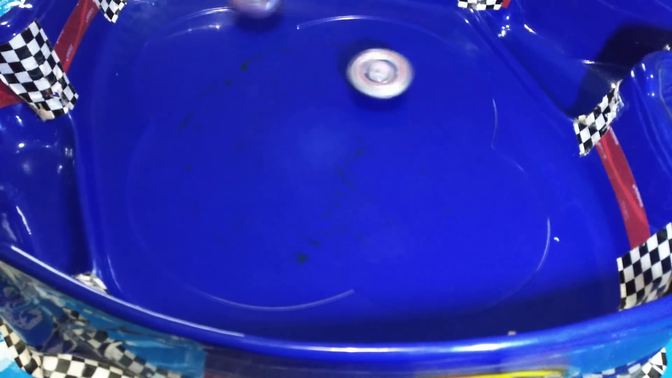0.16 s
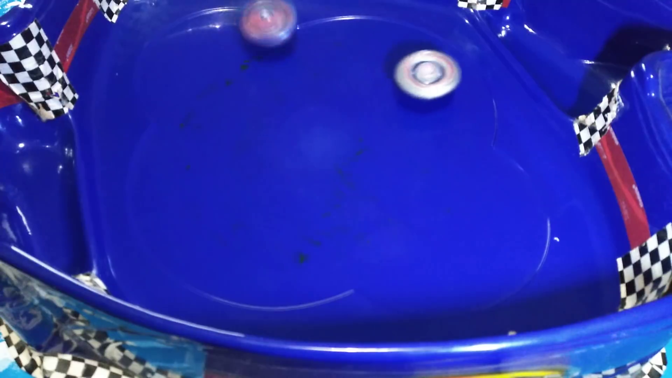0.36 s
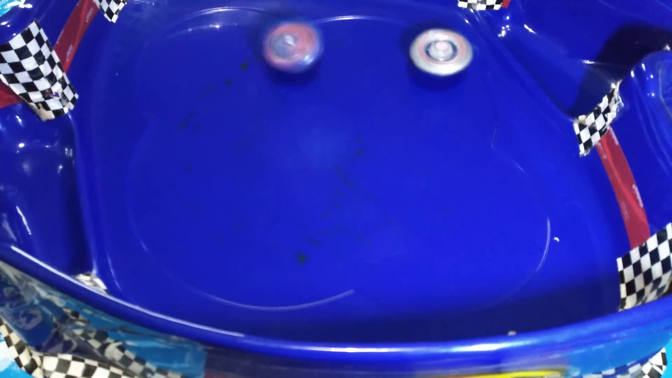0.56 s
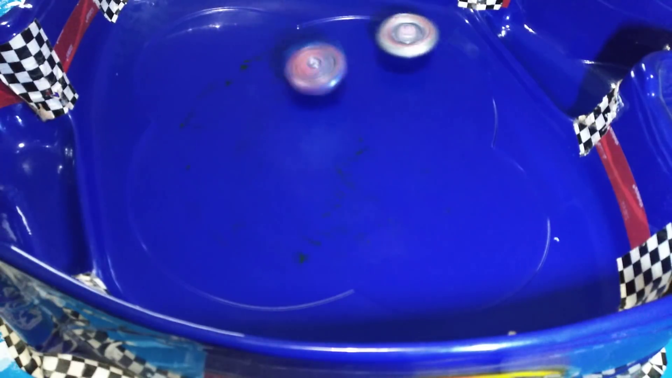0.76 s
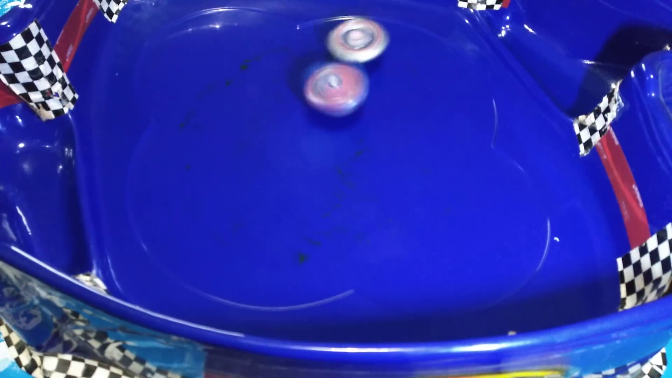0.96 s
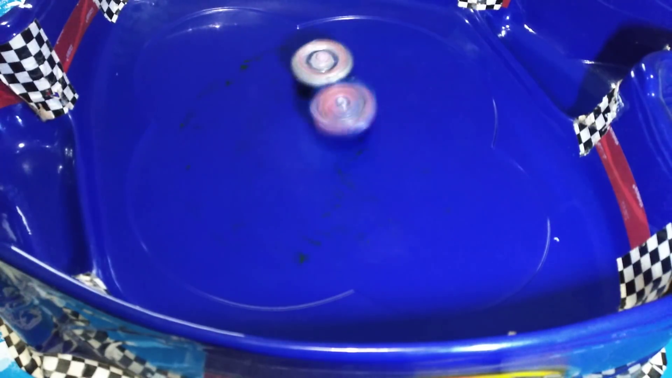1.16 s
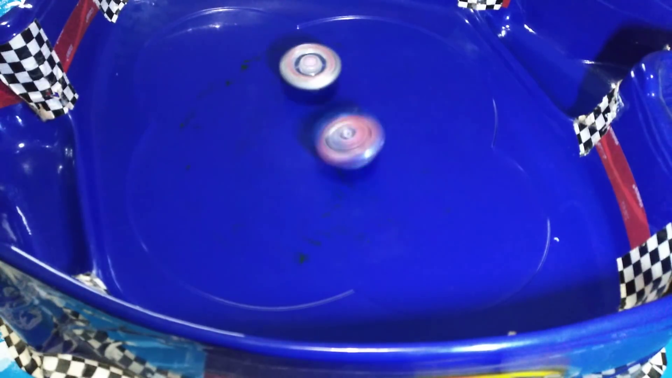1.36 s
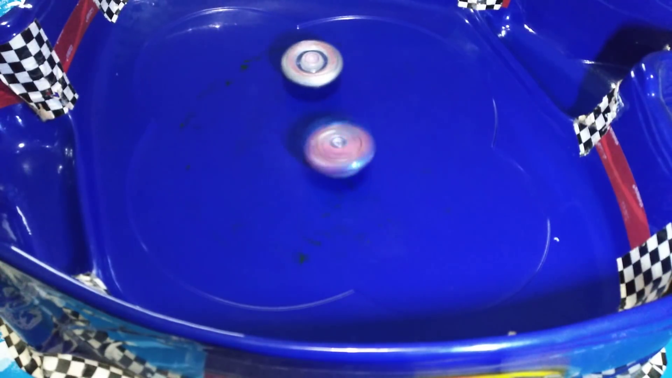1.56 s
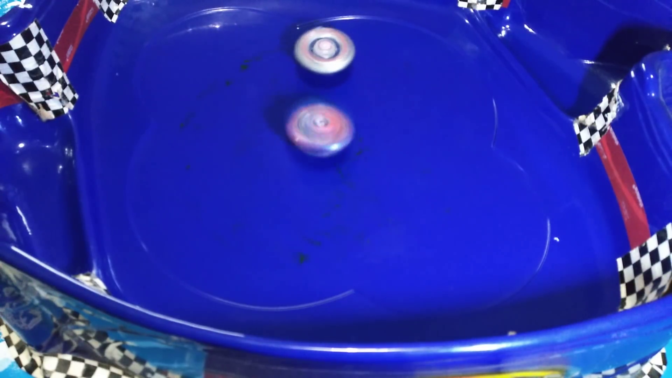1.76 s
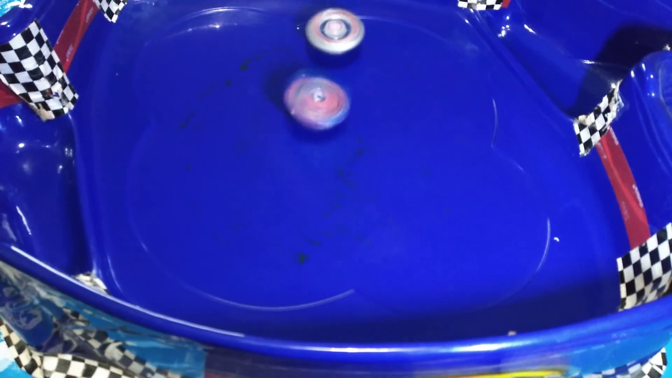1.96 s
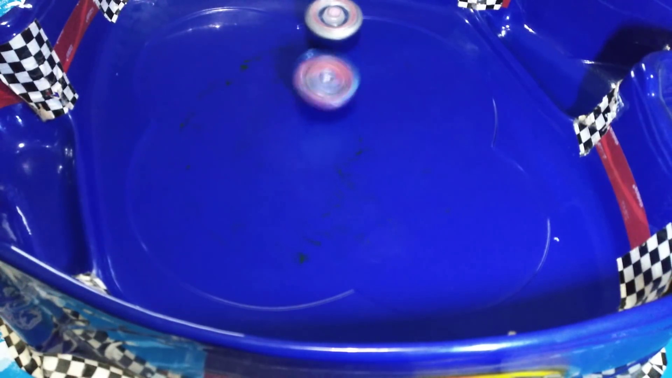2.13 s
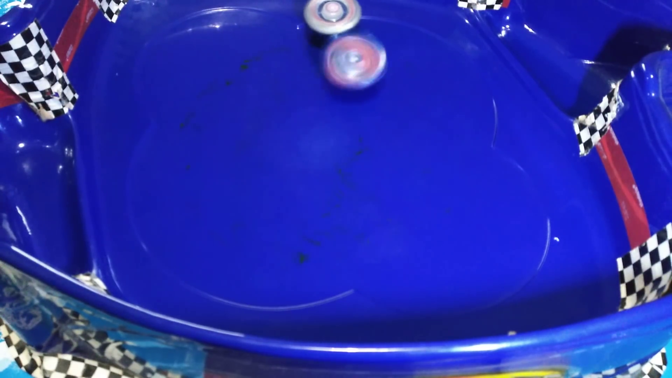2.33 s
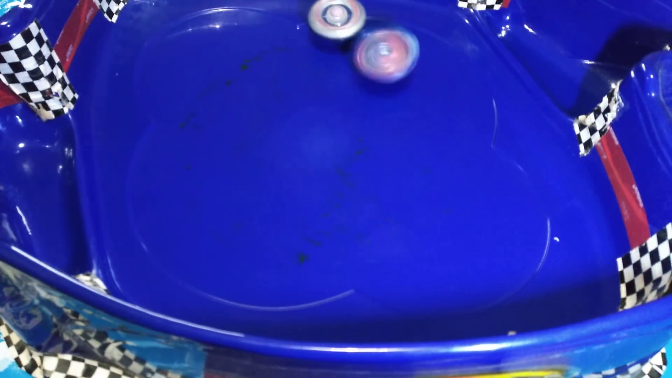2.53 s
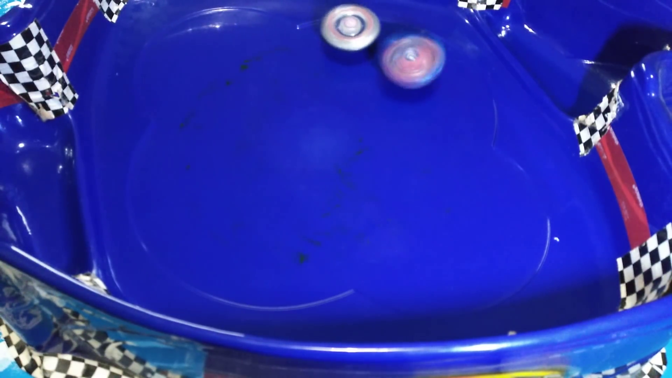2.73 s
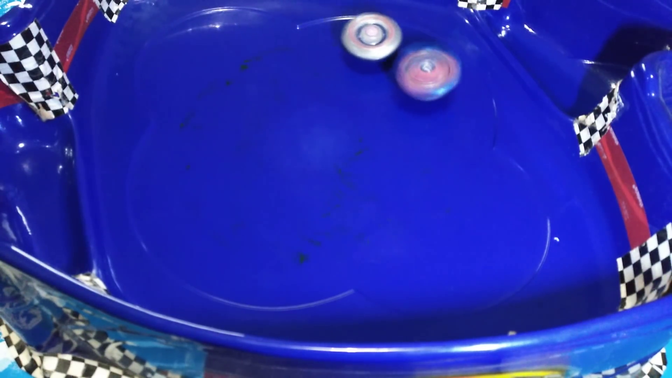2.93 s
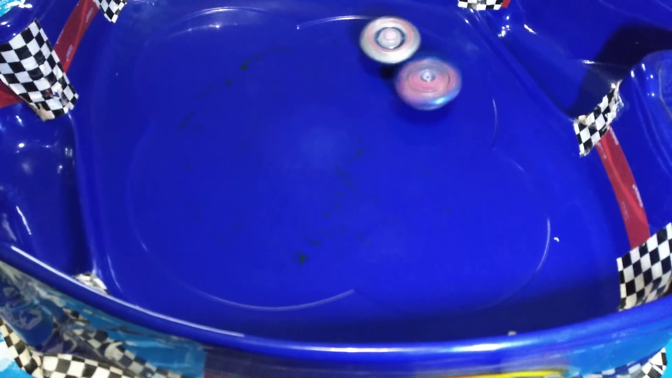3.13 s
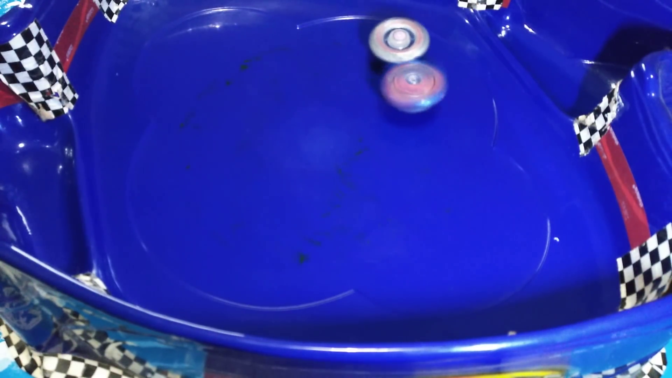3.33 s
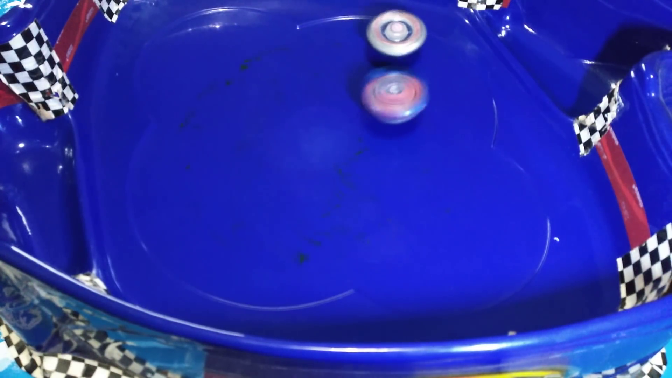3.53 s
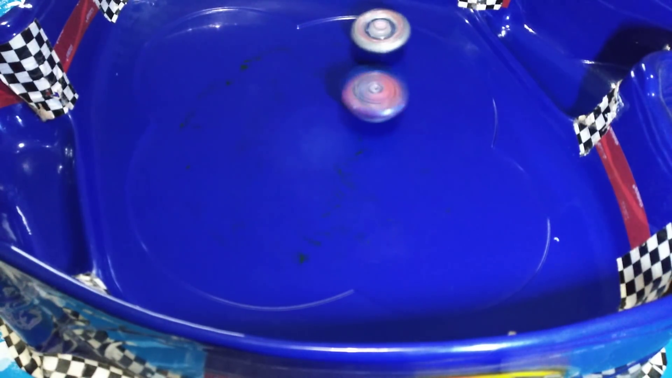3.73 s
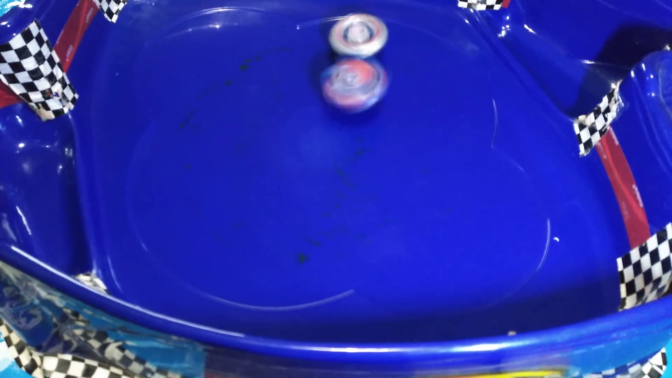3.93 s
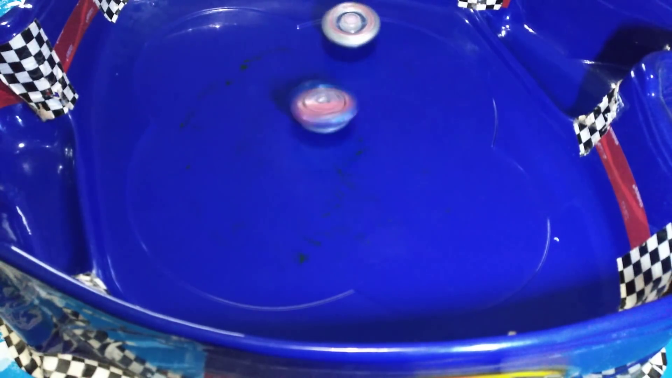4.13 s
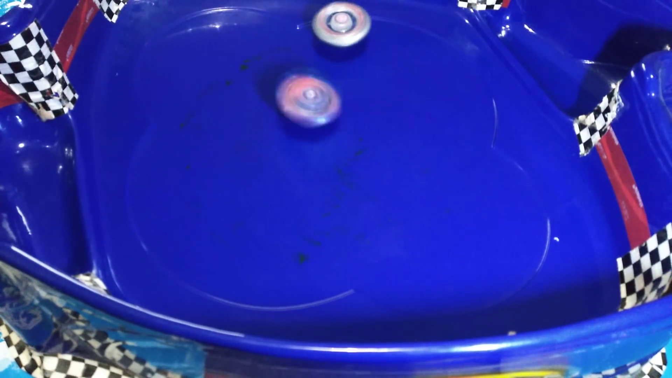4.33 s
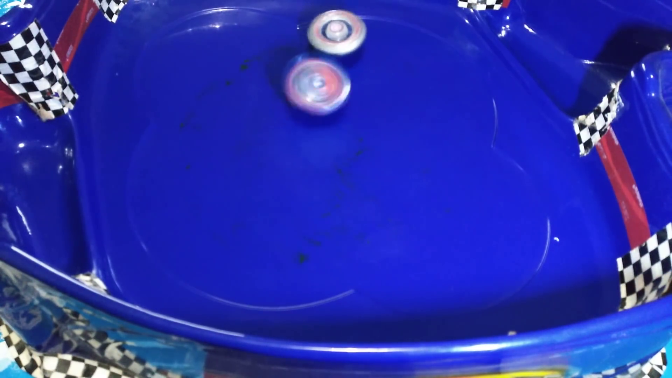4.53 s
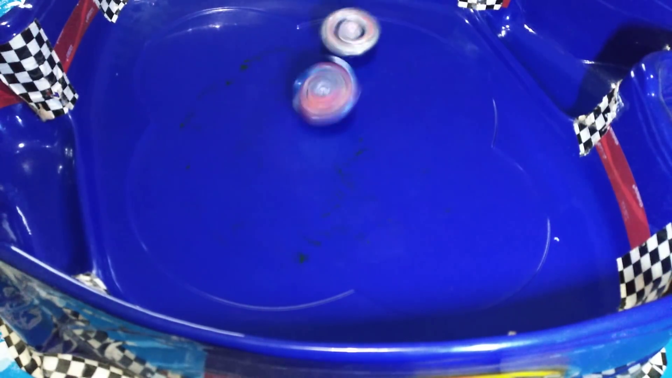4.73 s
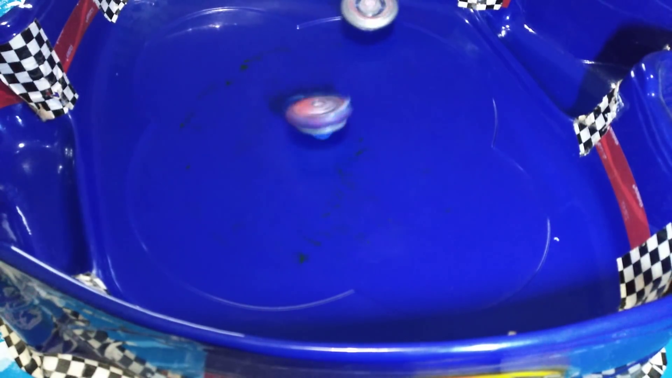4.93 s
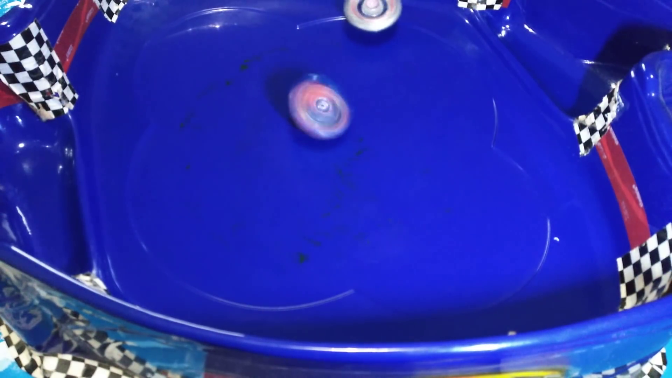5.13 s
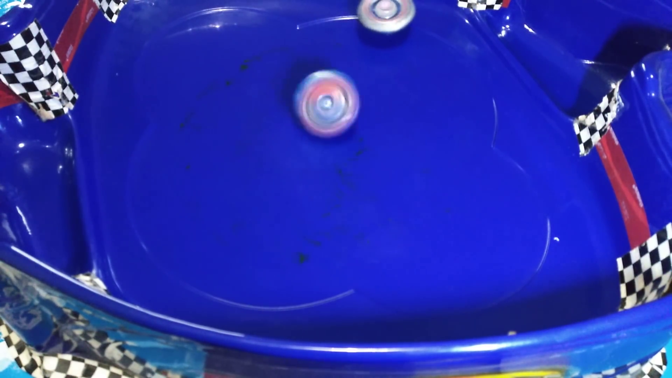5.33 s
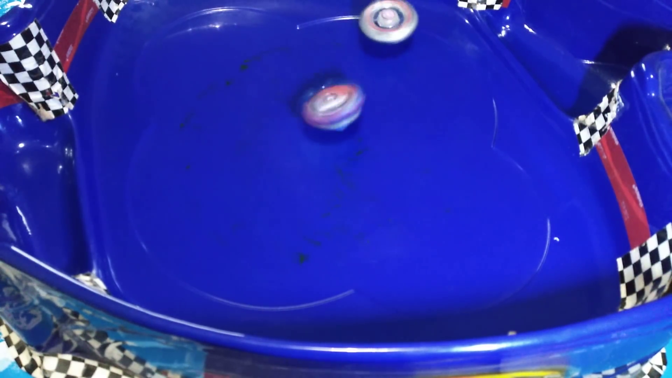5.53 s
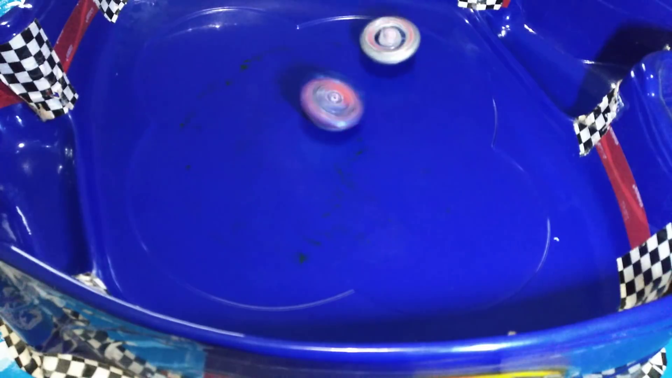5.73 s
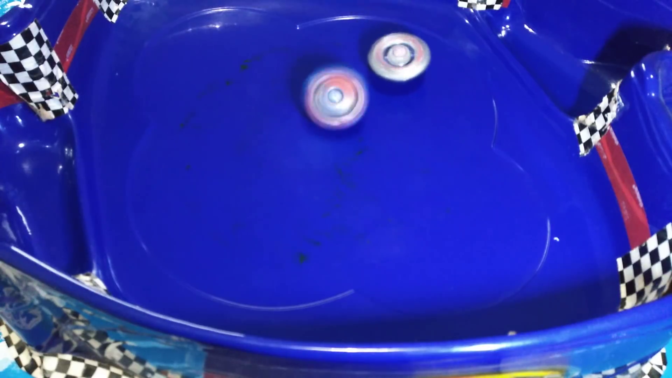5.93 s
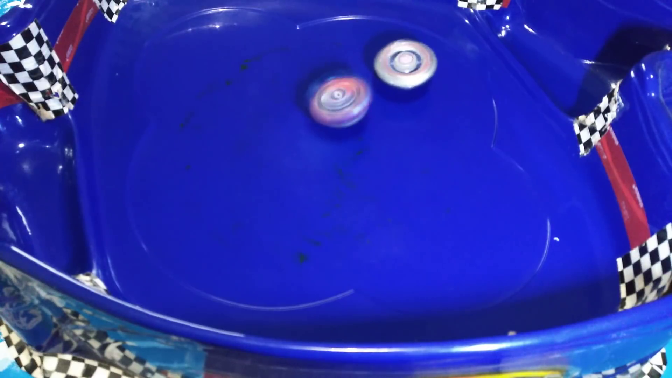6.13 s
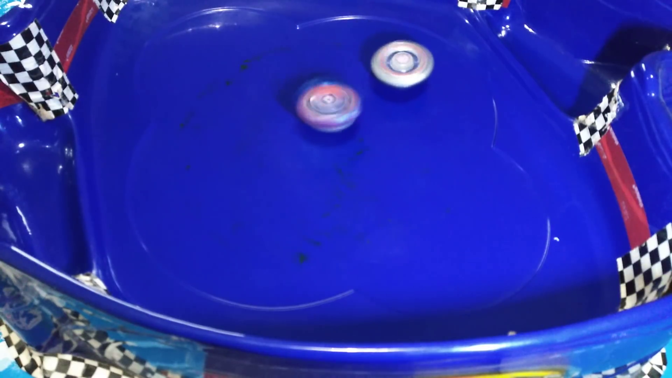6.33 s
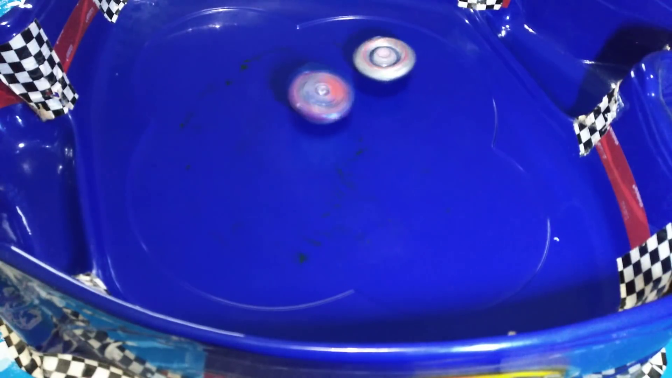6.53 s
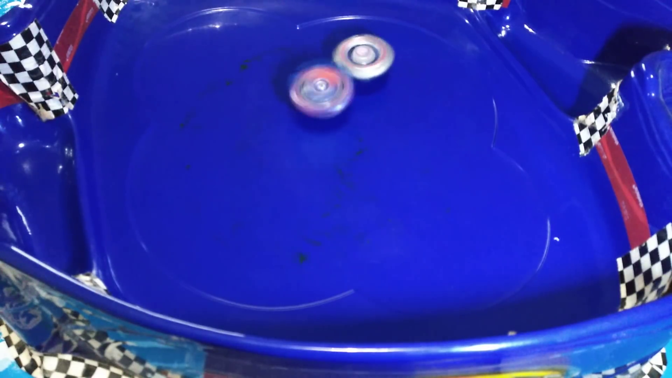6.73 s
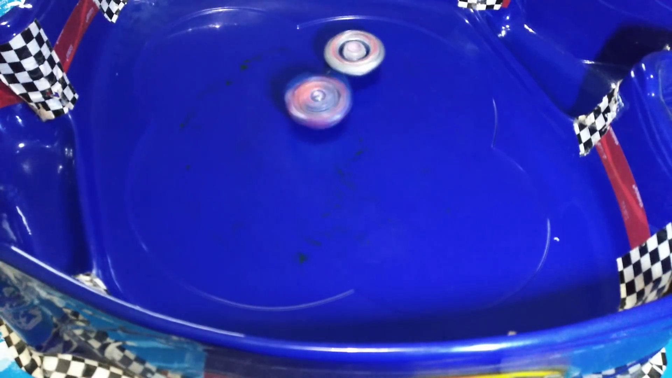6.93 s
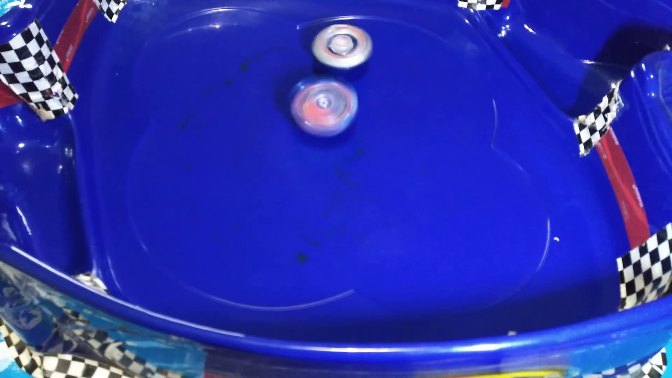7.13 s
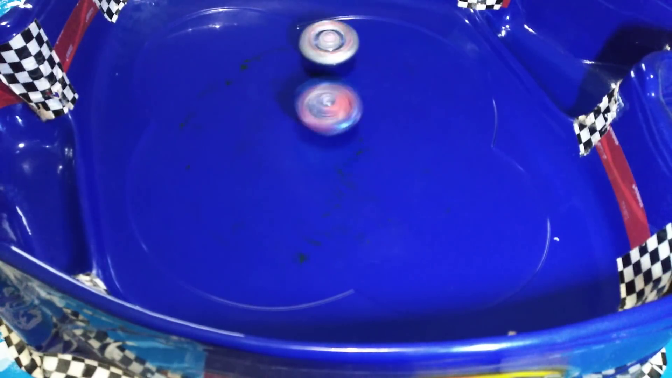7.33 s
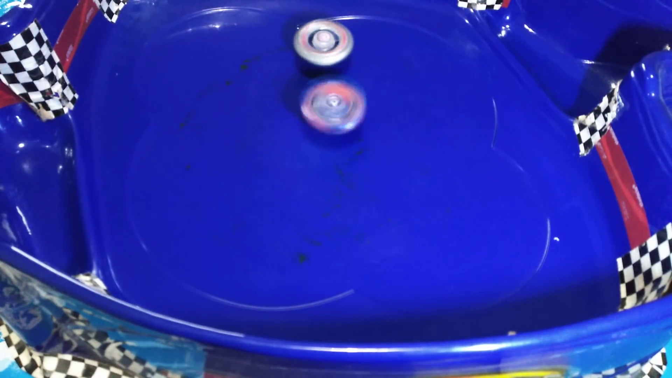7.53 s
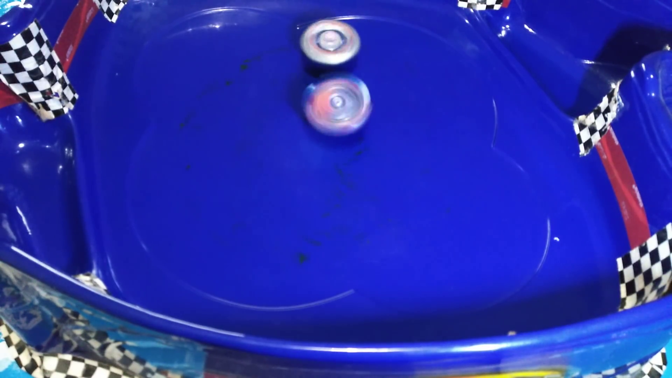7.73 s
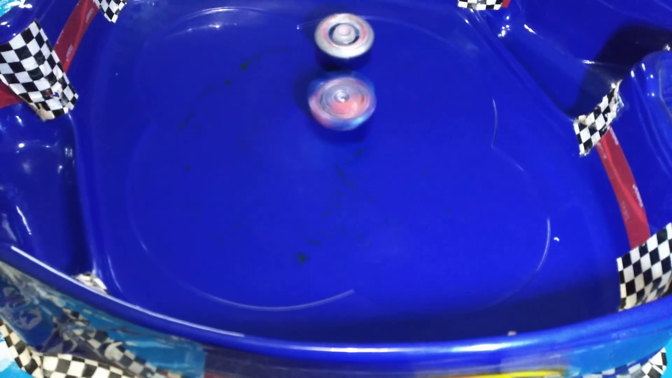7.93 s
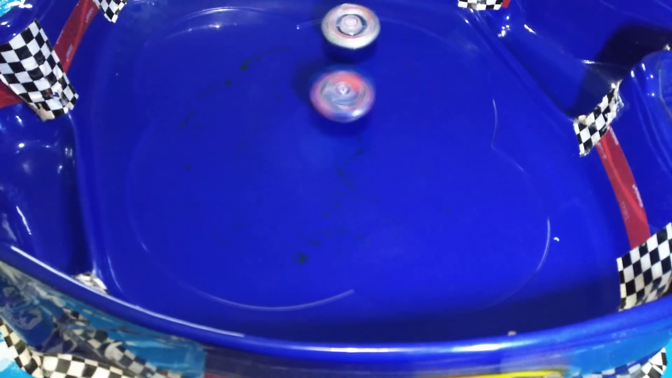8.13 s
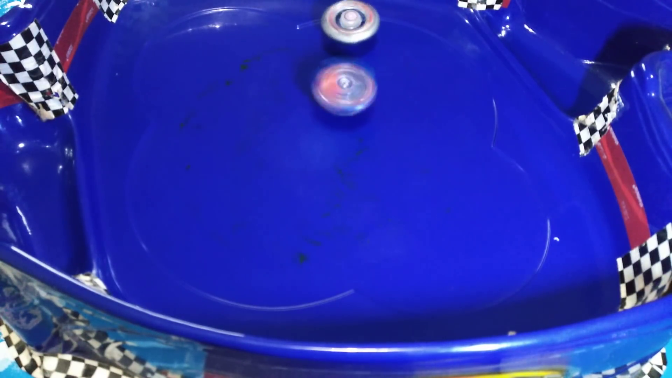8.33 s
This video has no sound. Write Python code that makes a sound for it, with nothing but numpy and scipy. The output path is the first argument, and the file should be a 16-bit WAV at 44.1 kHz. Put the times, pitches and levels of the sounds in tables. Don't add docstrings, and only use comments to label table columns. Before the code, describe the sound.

Close stereo in a small room: a top slams into a thin plastic arena with a burst of hollow knocks, then two tops circle with low buzzing hum and fine rattling. Metal rims crack together sharply four times in the first five seconds. Wobbling brings clattering loose parts and soft booms; later scuffing rubs give way to faint ticks and near silence.

```python
import sys
import numpy as np
from scipy import signal
from scipy.fft import rfft, irfft, next_fast_len
from scipy.io import wavfile
from scipy.ndimage import uniform_filter1d, map_coordinates

SR = 44100
rng = np.random.default_rng(int(sys.argv[2]) if len(sys.argv) > 2 else 0)


def convert_level_to_amplitude(level_db):
    exponent = np.asarray(level_db, float) / 20
    return 10 ** exponent


def to_wav(sig):
    pcm = np.clip(np.atleast_2d(sig), -1, 1) * 32767
    pcm = np.round(pcm).astype(np.int16)
    wavfile.write(sys.argv[1], SR, pcm.T)


N = 373527
TIME = np.arange(N) / SR

# t/s, speed/(turns per s)
SPIN = [(0.0, 18.95), (1.9, 15.65), (3.35, 14.55), (8.47, 11.33)]
# t/s, level/dB
TRAVEL = [(.2, -60.5), (.69, -55), (.88, -59.5), (.96, -75), (1.44, -61.5), (1.73, -66), (1.76, -57),
          (2.27, -50.5), (2.75, -63.5), (3.1, -74.5), (3.88, -72), (4.05, -50), (4.43, -59.5),
          (4.72, -52.5), (5.66, -53), (6.5, -64), (6.94, -53.5), (7.4, -86.5)]
# f/Hz, width/Hz, level/dB
SHELL = [(124, 16, -12), (277, 40, -6.5), (345, 28, -5), (451, 52, 3), (577, 31, -1), (886, 92, -4),
         (1300, 80, -6.5)]
# f/Hz, width/Hz, level/dB
TAP = [(558, 24, -10.5), (1004, 55, 4), (1400, 73, -10.5), (1816, 140, -4.5)]
# f/Hz, width/Hz, level/dB
CHATTER = [(3310, 400, 0), (4600, 300, -9)]
# f/Hz, width/Hz, level/dB
TINKLE = [(5620, 1200, -4), (7830, 370, 5.5), (10000, 51, -14), (11000, 26, -11.5), (11500, 210, -17.5),
          (13300, 130, -16)]
# f/Hz, density/dB per Hz
LOW = [(15, -43), (25, -37), (86, 5), (113, 1), (144, -5), (188, -5.5), (220, -26), (260, -4.5), (340, -31),
       (570, -120)]
# f/Hz, density/dB per Hz
BUMP = [(88, -36), (150, 0), (370, -3.5), (452, 1), (493, -12.5), (539, -3), (1560, -22), (3000, -44),
        (3900, -67), (6600, -120)]
# f/Hz, density/dB per Hz
SCRAPE = [(880, -30), (1500, -1), (1630, -21.5), (1830, -4.5), (2250, -18), (3290, -10.5), (3760, -9),
          (7550, -12), (9060, -38.5), (13000, -42), (14800, -42.5)]
# f/Hz, density/dB per Hz
RUB = [(180, -17.5), (300, 2.5), (522, -12.5), (760, -4.5), (1040, -22), (1280, -3.5), (1430, -13.5),
       (3690, -7), (6420, -6.5), (13200, -25.5), (14800, -40.5)]
THUMP_FROM_S, THUMP_TO_S = 1.9045, 2.96


def unit(x):
    return x / np.sqrt(np.mean(x ** 2) + 1e-20)


def along(points, hz):
    f, v = np.transpose(points)
    return np.interp(np.log(hz + 1), np.log(f + 1), v)


def curve(rows):
    s, value = np.transpose(rows)
    return np.interp(TIME, s, value)


def wobble(rate):
    knots = rng.standard_normal(int(N * rate / SR) + 4)
    return map_coordinates(knots, [np.arange(N) * rate / SR])


def filtered(x, response):
    m = next_fast_len(N + SR // 2)
    return irfft(rfft(x, m) * response(np.fft.rfftfreq(m, 1 / SR)), m)[..., :N]


def body(peaks, size=4096):
    f = np.fft.rfftfreq(size, 1 / SR)
    response = 0
    for k, (hz, width, db) in enumerate(peaks):
        loss = 1j * f * width
        response = response + (-1) ** k * convert_level_to_amplitude(db) * loss / (hz * hz - f * f + loss)
    h = irfft(response)
    return h / np.linalg.norm(h)


def colour(spectrum, size=4096):
    gain = convert_level_to_amplitude(along(spectrum, np.fft.rfftfreq(size, 1 / SR)))
    cepstrum = irfft(np.log(gain + 1e-6))
    cepstrum[1:size // 2] *= 2
    cepstrum[size // 2 + 1:] = 0
    h = irfft(np.exp(rfft(cepstrum)))
    return h / np.linalg.norm(h)


def through(x, h):
    return signal.fftconvolve(x, h)[:N]


def bursts(times, db, t60, rise=0.00071, size=2048):
    t = np.arange(size) / SR
    decay = np.reshape(np.maximum(t60, 1 / SR), (-1, 1))
    puff = rng.standard_normal((len(times), size)) * convert_level_to_amplitude(-60 * t / decay)
    puff *= (1 - np.exp(-(t + 1 / SR) / rise)) ** 2
    puff *= convert_level_to_amplitude(db)[:, None] / np.linalg.norm(puff, axis=1, keepdims=True)
    at = np.round(np.asarray(times) * SR).astype(int)[:, None] + np.arange(size)
    return np.bincount(np.clip(at.ravel(), 0, N), puff.ravel(), N + 1)[:N]


def sides(times, pan_db):
    latest = np.clip(np.searchsorted(times, TIME + .002) - 1, 0, None)
    return convert_level_to_amplitude(pan_db[latest] * np.array([[.5], [-.5]]))


def pair(first, second):
    # f/Hz, correlation/1
    alike = [(60, 0.97), (130, 0.84), (290, 0.98), (630, 0.84), (1370, 0.65), (2990, -0.0075),
             (6540, 0.071), (14300, 0.043)]

    def blend(hz):
        turn = np.arccos(np.clip(along(alike, hz), -1, 1)) / 2
        return np.array([np.cos(turn), np.sin(turn)])

    mid, side = filtered(np.array([first, second]), blend)
    return np.array([mid + side, mid - side])


def both(make):
    return pair(make(), make())


def hiss(h):
    return both(lambda: through(rng.standard_normal(N), h))


def struck(h, *burst, **shape):
    return both(lambda: through(bursts(*burst, **shape), h))


def patchy(x, depth_db, wide, long):
    z = signal.stft(x, nperseg=1024)[2]
    field = uniform_filter1d(rng.standard_normal(z.shape[1:]), wide, 0)
    field = uniform_filter1d(field, long, 1)
    return unit(signal.istft(z * convert_level_to_amplitude(depth_db * unit(field)), nperseg=1024)[1][:, :N])


def grit(scatter_db, rate):
    hit = rng.random(N) < rate / SR
    return hit * convert_level_to_amplitude(scatter_db * rng.standard_normal(N)) * rng.choice([-1, 1], N)


def lobes(turns, scatter_db, memory, count):
    slot = np.floor(turns * count).astype(int)
    at = np.flatnonzero(np.diff(slot))
    knots = rng.standard_normal((2, 400, count))
    where = [turns[at] / max(memory, .5), slot[at] % count]
    size, push = (map_coordinates(k, where, order=1) for k in knots)
    out = np.zeros(N)
    out[at] = convert_level_to_amplitude(scatter_db * size) * push
    return out


def rolling():
    # t/s, level/dB
    lean_curve = [(.69, -70.5), (.9, -88.5), (1.73, -75), (1.76, -63), (2.93, -78.5), (3.06, -86),
                  (3.9, -83), (4.05, -59), (4.6, -76.5), (4.85, -54.5), (6.25, -65.5), (6.57, -79.5),
                  (6.6, -52.5), (6.94, -50.5), (7.35, -96.5), (7.8, -86), (7.94, -71.5), (8.47, -80.5)]
    travel, lean = convert_level_to_amplitude(curve(TRAVEL)), convert_level_to_amplitude(curve(lean_curve))
    turns = np.cumsum(curve(SPIN)) / SR

    def tip(h, scatter_db, memory):
        return unit(both(lambda: through(lobes(turns, scatter_db, memory, count=41), h)))

    boom = unit(tip(colour(LOW), 2, memory=4) + .5 * unit(hiss(colour(LOW))))
    bumps = unit(tip(colour(BUMP), 4, memory=4.5) + .3 * unit(hiss(colour(BUMP))))
    parts = body(TINKLE) + 0.8 * body(CHATTER)
    specks = unit(both(lambda: through(grit(6.7, rate=520), parts)))
    sweep_db = 3.3 * np.cos(4 * np.pi * turns) + 0.97 * wobble(45)
    scrape = unit(convert_level_to_amplitude(sweep_db) * (unit(hiss(colour(SCRAPE))) + .5 * specks))
    bumps, scrape = patchy(bumps, 3.5, 3, 18), patchy(scrape, 4.5, 6, 16)
    thumping = (TIME > THUMP_FROM_S) & (TIME < THUMP_TO_S)
    bumps = bumps * convert_level_to_amplitude(-0.5 * thumping)
    drag = convert_level_to_amplitude(-1 - 55) * (lean / convert_level_to_amplitude(-55)) ** 1.4
    bump_gain = np.hypot(convert_level_to_amplitude(3.5) * travel, drag)
    return convert_level_to_amplitude(3) * travel * boom + bump_gain * bumps + convert_level_to_amplitude(.5) * lean * scrape


def thumps():
    turns = np.cumsum(curve(SPIN)) / SR
    whole = np.arange(turns[round(THUMP_FROM_S * SR)], turns[round(THUMP_TO_S * SR)])
    second = whole[3:] + .46
    at = np.searchsorted(turns, np.concatenate([whole, second]))
    db = curve(TRAVEL)[at] + 32.5 + 0.5 * (np.arange(len(at)) >= len(whole))
    db = db + 3 / 2 * rng.standard_normal(len(at))
    return struck(colour(BUMP) + 0.2 * body(TAP), at / SR, db, 0.0143, rise=0.00094)


def clang(peaks, size=4096):
    contact_s, extra_loss = 0.0016, 1.3
    hz, wide, db = np.transpose(peaks)[:, :, None]
    t = np.arange(size) / SR
    decay = np.exp(-np.pi * extra_loss * wide * t)
    h = convert_level_to_amplitude(db) * wide * decay * np.sin(2 * np.pi * (hz * t + rng.random(hz.shape)))
    h = h.sum(axis=0) * (1 - np.exp(-t / contact_s)) ** 2
    return h / np.linalg.norm(h)


def clashes():
    # t/s, peak level/dB, shell knock/dB, blow length/s, left over right/dB
    clash = [
        (1.122, -9.5, -21.5, 0.013, 2),
        (3.3325, -16.5, -18.5, 0.0086, -0.5),
        (3.8841, -6, -18, 0.0098, -3),
        (4.6395, -6.5, -24, 0.015, -3),
    ]
    # f/Hz, density/dB per Hz
    blow = [
        [(120, -41), (200, -19), (1400, -4), (2310, -6), (2670, -10), (2970, -6), (6800, 0), (13500, -19.5),
         (14800, -47.5)],
        [(120, -52), (200, -34), (771, -16), (1250, -3.5), (1580, -19.5), (1760, -11.5), (6800, -8.5),
         (11500, -19.5), (14800, -36)],
        [(120, -43.5), (200, -15.5), (441, -14.5), (992, -15.5), (1280, -7.5), (2570, -7.5), (5890, -0.5),
         (13500, -14), (14800, -68)],
        [(120, -24), (200, -8.5), (1300, -8), (3970, -9.5), (4500, -0.5), (6800, -1), (8000, -2),
         (13500, -28.5), (14800, -47)],
    ]
    # f/Hz, width/Hz, level/dB
    modes = [
        [(2190, 100, -9), (2470, 140, -14.5), (3160, 150, -7), (4750, 170, -4.5), (6980, 240, 3),
         (7820, 170, 0.5), (8000, 100, -9.5), (8800, 200, -14.5), (10700, 250, -11), (11200, 210, -15),
         (12140, 400, -14.5), (12980, 180, -14)],
        [(1294, 180, -12), (2130, 390, -6), (3070, 450, 2), (4190, 120, -7.5), (4720, 170, -9.5),
         (6700, 140, -13), (7070, 530, 2.5), (8800, 280, -5), (10400, 137, -21), (11240, 420, 0),
         (13260, 260, -11.5)],
        [(950, 170, -10.5), (1314, 35, -10), (2183, 250, -5), (3120, 83, -11), (4220, 150, 1.5),
         (4850, 110, -7.5), (4880, 140, -5.5), (5730, 290, 1.5), (7244, 190, -1), (8400, 290, -7),
         (11000, 250, -6.5), (13450, 120, -11.5)],
        [(1268, 40, -7.5), (2580, 60, -11), (3147, 150, -15), (4400, 110, -5), (5630, 80, -6.5),
         (6100, 160, -15.5), (7860, 130, 1.5), (10700, 95, -9.5), (11400, 200, -14), (12700, 170, -18.5),
         (13000, 220, -12)],
    ]
    # f/Hz, level/dB, t60/s
    metal = [(3284, -14, .12), (4630, -6, .15), (4716, -11, .15), (5631, 0, .18), (5776, -6, .16),
             (6830, -14, .1), (7919, -3, .06), (10780, -14, .11), (11220, -15, .11), (13140, -17, .08)]
    ring_db = [-31, -28, -29, -13]
    s, db, knock_db, length, pan = np.transpose(clash)
    each = [slice(k, k + 1) for k in range(len(s))]

    def clangs():
        return sum(through(bursts(s[k], db[k] + 16, 0, size=8), clang(m)) for k, m in zip(each, modes))

    crack = sum(struck(colour(b), s[k], db[k] + 10, length[k], rise=.0011) for k, b in zip(each, blow))
    near_clang, far_clang = clangs(), clangs()
    crack = crack + pair(near_clang, far_clang)
    knocked = body(SHELL) + 0.2 * colour(BUMP) + 0.21 * colour(LOW)
    knock = struck(knocked, s, db + knock_db + 23.0, 0.037)
    shaken = colour(LOW) + 1.2 * colour(BUMP)
    knock = knock + struck(shaken, s, db - 20.5 + 18.5, 0.53, size=16384)

    t, ring = np.arange(SR // 2) / SR, np.zeros((2, N + SR))
    onset = 1 - np.exp(-t / 0.000081)
    for start, level in zip(s, db + ring_db):
        drift = .02 * np.cumsum(rng.standard_normal((len(metal), 2, len(t))), axis=2)
        first = round(start * SR)
        for (hz, own_db, t60), blur in zip(metal, drift):
            tone = np.sin(2 * np.pi * hz * t + blur)
            ring[:, first:first + len(t)] += convert_level_to_amplitude(level + own_db - 60 * t / t60) * tone * onset

    even = sum(through(bursts(s[k], db[k] + 15, 0, size=8), colour(b)) for k, b in zip(each, blow))
    carried = even + .3 * near_clang + ring[0, :N] + knock[0]
    return (crack + ring[:, :N]) * sides(s, pan) + knock, carried


def shell():
    # t/s, peak level/dB, rattle/dB
    drop = [(.002, -3, -5.5), (.0045, -4.5, -19), (.009, -7.5, -10), (0.011, -5.5, -10.5),
            (0.0207, -10, -21), (0.0212, -2, -14), (.026, -5.5, -11), (.034, -15.5, -26.5),
            (0.042, -17, -23.5), (.118, -19.5, -26.5), (0.1228, -14.5, -28), (0.1461, -20.5, -7),
            (4.94, -39, -19), (4.985, -24, -16), (4.995, -20.5, -14.5), (5.001, -20.5, -15.5),
            (5.014, -29.5, -12.5), (5.045, -27, -4), (5.428, -33, 2.5), (5.487, -29, -2.5),
            (6.244, -40.5, -9), (6.363, -34, -2), (6.472, -38.5, 0), (7.942, -42, -15), (8.015, -47.5, -15)]
    # f/Hz, density/dB per Hz
    landing = [(35, -60.5), (110, -11), (335, -1.5), (411, -12), (477, 8.5), (786, -17.5), (911, -7.5),
               (1420, -16), (5000, -34.5), (6500, -66), (11000, -120)]
    # t/s, f/Hz, peak level/dB, swell/s, t60/s
    boom = [
        (5.699, 120, -25, 0.011, 0.16),
        (5.785, 112, -38, 0.014, 0.2),
        (6.114, 120, -37, 0.019, 0.16),
        (6.93, 250, -31, 0.018, 0.11),
        (3.905, 1290, -34, 0.006, 0.05),
    ]
    s, db, rattle_db = np.transpose(drop)
    push = np.zeros(N)
    push[np.round(s * SR).astype(int)] = convert_level_to_amplitude(db + 10.0) * rng.choice([-1, 1], len(s))
    blunt = np.hanning(24) / 6
    soft = signal.fftconvolve(body(SHELL) + 1.04 * colour(landing), blunt)
    soft = soft * convert_level_to_amplitude(-60 * np.arange(len(soft)) / SR / 0.12)
    out = through(push, soft) + struck(colour(RUB), s, db + rattle_db + 11.0, 0.024)
    for start, hz, peak_db, swell, t60 in boom:
        t = np.clip(TIME - start, 0, None)
        envelope = convert_level_to_amplitude(peak_db - 60 * t / t60) * (1 - np.exp(-t / swell)) ** 2
        out = out + envelope * 4 * np.sin(2 * np.pi * hz * t)
    return out


def grinds():
    # t/s, peak level/dB, shell knock/dB, rub length/s, left over right/dB
    grind = [(4.232, -43, -12, 0.17, 3), (4.5274, -46.5, 5, 0.041, 4.5), (6.578, -51, -32, 0.38, 18.5),
             (6.5893, -58, -15, 0.14, 28), (6.6389, -16.5, -8.5, 0.076, -1.5),
             (6.718, -21.5, -7.5, 0.087, 1.5), (6.906, -42, -21, 0.18, 21.5), (7.041, -35.5, -10, 0.088, 8),
             (7.052, -22, -53.5, 0.087, 12.5), (7.0651, -21.5, -8.5, 0.27, 5),
             (7.941, -45.5, -20, 0.05, 11), (8.127, -55, -1.5, 0.039, -19)]
    s, db, knock_db, length, pan = np.transpose(grind)
    rub = struck(colour(RUB), s, db + 19.0, length, rise=0.00034, size=8192)
    rub = rub + struck(colour(RUB), s, db - 3.5, 0.0035)
    shaken = body(SHELL) + 0.24 * colour(BUMP) + 0.89 * colour(LOW)
    return rub * sides(s, pan) + struck(shaken, s, db + knock_db + 19.0, 0.12)


def knocks():
    # t/s, peak level/dB, larger parts/dB
    launch = [(0.1513, -51, -15), (0.2331, -47, -27), (0.29, -45, -38), (0.3479, -47, -28),
              (0.4052, -43.5, -31), (0.4222, -46, -21), (0.4606, -40, -30), (0.4781, -41.5, -22),
              (0.515, -38.5, -26), (0.5334, -41.5, -32), (0.5704, -39, -30), (0.5888, -40.5, -26),
              (0.6202, -42, -21), (0.6397, -43, -29), (0.6596, -50, -27), (0.6776, -38.5, -31),
              (0.7165, -45, -24), (0.7375, -42.5, -35), (0.7559, -60, -20), (0.7729, -51, -26),
              (0.8043, -50, -17.5), (0.8288, -52, -21), (0.8861, -53.5, -27), (0.9435, -49.5, -28.5)]
    # t/s, peak level/dB, larger parts/dB
    circling = [(1.3964, -52, -20.5), (1.41, -65, -8.5), (1.4566, -58.5, -18.5), (1.4731, -52, -16.5),
                (1.526, -53.5, -10), (1.5989, -64.5, 6.5), (1.6505, -53, -14), (1.7024, -52, -14.5),
                (1.7791, -47, -25), (1.7949, -42, -22), (1.831, -47.5, -7), (1.852, -38, -19.5),
                (1.894, -42, -12), (1.9234, -36.5, -28), (1.953, -42, -19), (1.97, -46, -29),
                (1.983, -36.5, -30), (2.0174, -42, -29), (2.051, -41.5, -32), (2.1168, -44, -27),
                (2.1297, -46, -25), (2.176, -39.5, -26), (2.238, -43.5, -23), (2.3077, -43, -15),
                (2.3736, -49.5, -16), (2.4439, -48.5, -16), (2.5026, -57, -8), (2.52, -51, -15),
                (2.5684, -49.5, -13), (2.587, -51, -24), (2.607, -57, -9), (2.636, -45.5, -19),
                (2.6699, -49, -19), (2.6964, -48, -16), (2.717, -49, -18), (2.7534, -44, -20),
                (2.768, -45.5, -24), (2.815, -48, -21), (2.8474, -49.5, -25), (2.887, -48, -18),
                (2.9177, -51, -17), (2.9557, -54.5, -15.5), (2.9784, -48.5, -22), (3.174, -66, -1)]
    # t/s, peak level/dB, larger parts/dB
    after_clash = [(4.093, -47.5, -31), (4.1191, -40, -13), (4.159, -50, -15), (4.1855, -39.5, -13),
                   (4.229, -46.5, -2.5), (4.3446, -51, -12.5), (4.3731, -52.5, -23), (4.393, -48.5, -19.5),
                   (4.476, -45.5, -35.5), (4.5203, -49.5, -12.5)]
    # t/s, peak level/dB, larger parts/dB
    wobbling = [(4.6701, -19.5, -12.5), (4.8284, -44, -11.5), (4.8768, -31.5, -12.5), (4.9374, -26.5, -9.5),
                (4.9543, -40, -11), (4.9947, -33.5, -9), (5.044, -38.5, -8.5), (5.0767, -36.5, -6),
                (5.1088, -50.5, 5.5), (5.1546, -56, 7.5), (5.2079, -41, -9), (5.26, -57, 7),
                (5.3087, -47.5, 1), (5.3991, -42, -10), (5.4111, -34, -16.5), (5.4278, -42.5, -2.5),
                (5.489, -44, 0.5), (5.5312, -42, -15), (5.5573, -50, 2), (5.598, -49.5, -0.5),
                (5.6068, -38.5, -6.5), (5.6334, -54, -2), (5.6555, -43, -9), (5.6715, -54, 4),
                (5.6974, -57, 1), (5.7215, -45, -2), (5.7409, -42.5, -14), (5.7629, -44, -7),
                (5.7927, -58, 7.5), (5.8389, -46.5, -2), (5.912, -54.5, 9.5), (5.9586, -62, 13.5),
                (6.0237, -63.5, 9.5), (6.078, -58.5, 8), (6.1203, -57.5, 2), (6.1739, -52, -18),
                (6.2421, -44.5, -10.5), (6.3515, -45, -7.5), (6.3609, -42.5, -13.5), (6.3763, -47, 0.5),
                (6.473, -51.5, -3.5), (6.886, -44, -15), (7.0274, -73, -8)]
    # t/s, peak level/dB, larger parts/dB
    slowed = [(7.2723, -53.5, -15.5), (7.5287, -47.5, -25.5), (7.7198, -57, -22), (7.8684, -50, -18.5),
              (7.8999, -43.5, -25), (7.9333, -45.5, -18), (8.0061, -42.5, -16), (8.0435, -45, -23),
              (8.0879, -48, -17), (8.1248, -54.5, -1.5), (8.1373, -45, -26), (8.1937, -53, -28),
              (8.2231, -52.5, -20.5), (8.3379, -55, -19.5), (8.4421, -59, -11)]
    s, db, large_db = np.transpose(launch + circling + after_clash + wobbling + slowed)
    flight = .01 * np.cumsum(.5 + rng.random((len(s), 2)), axis=1).T
    hops = np.arange(3)[:, None]
    times = s + np.vstack([0 * s, flight])
    return times.ravel(), (db - 14 * hops).ravel(), (large_db - 6 * hops).ravel()


def rattles():
    s, db, large_db = knocks()

    def steep(peaks):
        return unit(np.convolve(body(peaks), body(peaks))[:4096]) / 64

    large = steep(CHATTER) + 0.54 * colour(SCRAPE) + 0.61 * body(TAP) + .5 * colour(BUMP)
    small = steep(TINKLE) + 0.79 * body(TINKLE) + 0.086 * colour(SCRAPE)
    heavy = struck(large, s, db + large_db + 23, 0.02, rise=.0012)
    return heavy + struck(small, s, db + 12.5, 0.018, rise=0.0012)


def taps():
    # first t/s, last t/s, rate/(taps per s), level/dB
    runs = [
        (.365, .88, 35, -52),
        (1.40, 1.62, 28, -64),
        (3.03, 3.15, 45, -67),
        (4.10, 4.22, 30, -50),
    ]
    times, levels = [], []
    for first, last, rate, db in runs:
        count = round((last - first) * rate) + 1
        times.append(np.linspace(first, last, count) + .001 * rng.standard_normal(count))
        levels.append(db + 3 * rng.standard_normal(count))
    return struck(body(TAP), np.concatenate(times), np.concatenate(levels) + 13, .018)


def dabs():
    # t/s, level/dB, upper mode/dB
    touches = [(3.074, -61.5, -7), (3.139, -60.5, -16), (3.186, -58, 0), (3.22, -69, 11), (3.247, -66, 3),
               (3.316, -52.5, 0.5), (3.508, -56, -17), (3.559, -59.5, -24.5), (3.623, -70, -25),
               (3.696, -61.5, -33), (3.725, -62, -28.5), (3.768, -66, -6.5), (3.797, -60, -12.5),
               (3.835, -64, -27)]
    # f/Hz, width/Hz, level/dB
    low_modes = [(553, 80, -8.5), (1030, 130, 5)]
    # f/Hz, width/Hz, level/dB
    high_modes = [(1920, 150, 0)]
    s, db, high_db = np.transpose(touches)
    low, high = (through(body(peaks), body(peaks)) for peaks in (low_modes, high_modes))
    lower = struck(low / np.linalg.norm(low), s, db + 15, 0.035)
    return lower + struck(high / np.linalg.norm(high), s, db + high_db + 14.5, .015)


def hum():
    # start t/s, loudest t/s, end t/s, f/Hz, peak level/dB
    sung = [(.3, .55, .92, 91, -49), (1.72, 1.8, 2.75, 98, -55), (4.0, 4.3, 4.5, 98.5, -59),
            (4.7, 4.76, 5.65, 95, -47.5), (.5, .86, .92, 141, -51), (1.75, 2.3, 2.66, 137, -51),
            (4.7, 4.82, 5.6, 150, -48), (.35, .45, .9, 228, -57), (2.1, 2.23, 2.85, 233, -49.5),
            (4.75, 4.89, 5.2, 284, -48.5), (6.72, 6.78, 6.83, 270, -46), (2.05, 2.27, 2.45, 445, -49),
            (6.72, 6.8, 6.88, 860, -50), (6.79, 6.95, 7.02, 740, -51), (6.78, 6.83, 6.88, 370, -50),
            (6.86, 6.91, 7.0, 900, -54), (7.09, 7.18, 7.23, 250, -54), (3.77, 3.83, 3.89, 110, -62),
            (7.04, 7.07, 7.2, 130, -49)]
    out = np.zeros(N)
    swell, waver = wobble(22), wobble(25)
    for start, loudest, end, pitch, peak_db in sung:
        hz = pitch * (1 - .1 * (TIME - loudest) / (end - start))
        db = np.interp(TIME, [start, loudest, end], [peak_db - 9, peak_db, peak_db - 11])
        edge = np.clip(np.minimum(TIME - start, end - TIME) / .03, 0, 1)
        own = rng.integers(N)
        wavering = hz * (1 + .025 * np.roll(waver, own))
        level = convert_level_to_amplitude(db - 2 + 3.5 * np.roll(swell, own))
        out += edge * level * np.sin(2 * np.pi * np.cumsum(wavering) / SR)
    return out


def skid():
    late = TIME - 7.945
    rise_db, fall_db = 139, 222
    rub = unit(hiss(colour(RUB[6:])))
    return convert_level_to_amplitude(-55.5 + np.minimum(rise_db * late, -fall_db * late)) * rub


def swish():
    # f/Hz, density/dB per Hz
    brushing = [(650, -69), (1100, -34), (1600, -3), (2400, 0.5), (3290, -12.5), (4530, -0.5), (5850, -24),
                (7630, -10), (14000, -42)]
    brush = patchy(hiss(colour(brushing)), 4, 8, 9)
    fade_in = np.clip((TIME - 7.3) / 0.078, 0, 1)
    ease = np.clip((TIME - 7.85) / 0.19, 0, 1)
    return convert_level_to_amplitude(-73.5 - 10.5 * ease) * fade_in * brush


def room(x, size=8192):
    # f/Hz, t60/s
    decay = [(200, 0.19), (1000, 0.3), (4000, 0.27), (12000, 0.24)]
    out = np.zeros((2, N + SR))
    for start in range(0, N, size):
        hz, t, z = signal.stft(rng.standard_normal((2, SR // 2)), SR, nperseg=256)
        tail = signal.istft(z * convert_level_to_amplitude(-60 * t / along(decay, hz)[:, None]), SR, nperseg=256)[1]
        wet = signal.fftconvolve(x[None, start:start + size], tail / np.linalg.norm(tail[0]), axes=1)
        out[:, start + round(.003 * SR):][:, :wet.shape[1]] += wet
    return out[:, :N]


def hush():
    # f/Hz, density/dB per Hz
    air = [(15, -54), (60, -22), (100, 4), (140, -38), (280, -50), (1170, -37), (7570, -35), (9370, -48),
           (14800, -49)]
    return convert_level_to_amplitude(-76) * patchy(hiss(colour(air)), 4, 6, 26)


def scene():
    # f/Hz, left over right/dB
    ports = [(100, -1), (2000, 1.5), (8000, -0.5)]
    clash, carried = clashes()
    blows = grinds() + shell()
    small = rattles() + taps() + dabs()
    sent = convert_level_to_amplitude(-1.0) * carried + convert_level_to_amplitude(-2.5) * blows[0] + convert_level_to_amplitude(-5.5) * small[0]
    far = filtered(sent, lambda hz: hz / (hz + 700))
    hits = clash + blows + small + room(far)
    left, right = hits + rolling() + hum() + swish() + skid() + thumps() + hush()
    left = filtered(left, lambda hz: convert_level_to_amplitude(along(ports, hz)))
    return np.array([np.roll(left, 4), right])


def top_cut(x):
    return signal.sosfilt(signal.butter(12, 14900, fs=SR, output="sos"), x)


def record(dry):
    rounded = dry / (1 + np.abs(dry) ** 8) ** (1 / 8)
    return top_cut(rounded)


dry = scene()
out = record(dry)
to_wav(out)
```